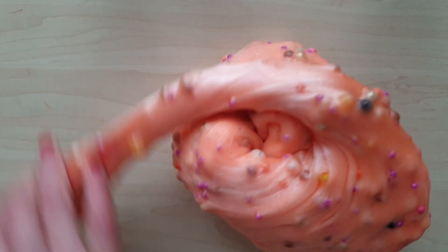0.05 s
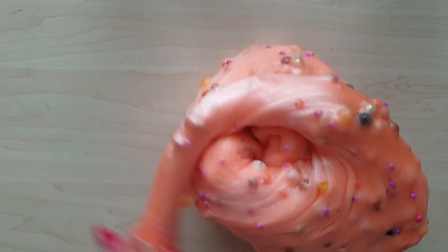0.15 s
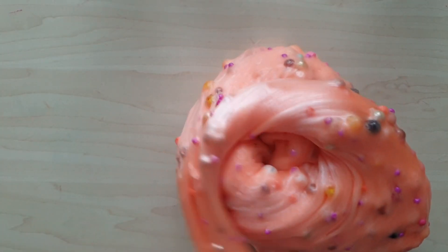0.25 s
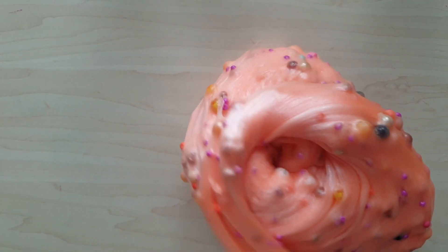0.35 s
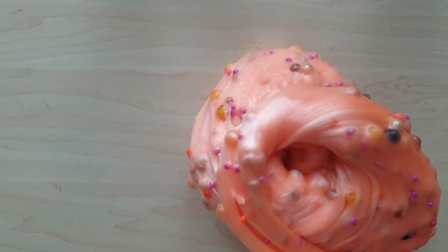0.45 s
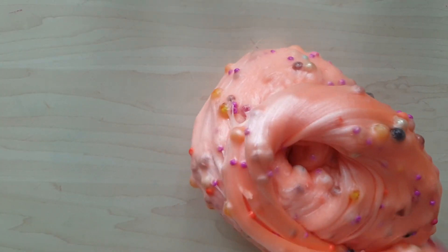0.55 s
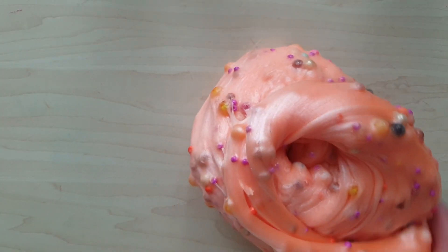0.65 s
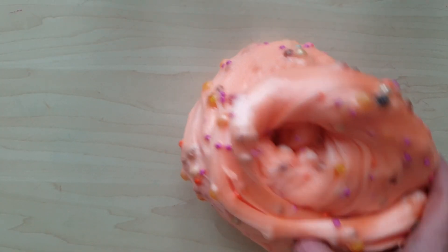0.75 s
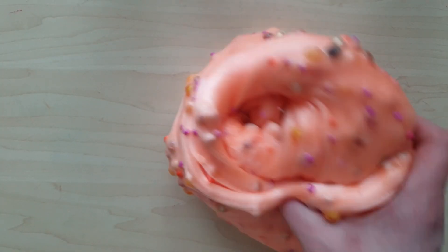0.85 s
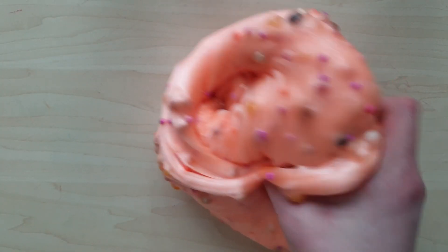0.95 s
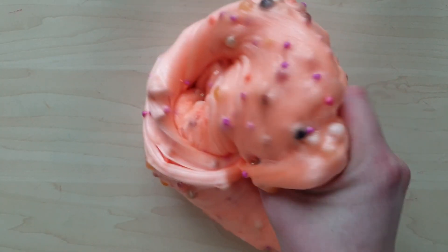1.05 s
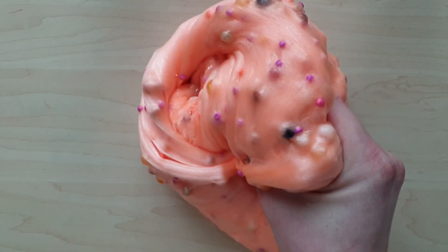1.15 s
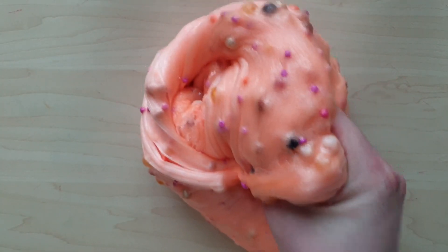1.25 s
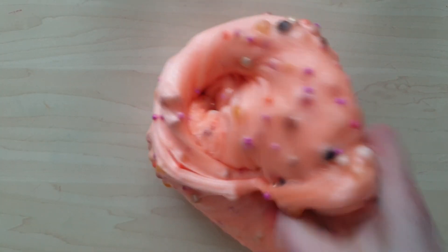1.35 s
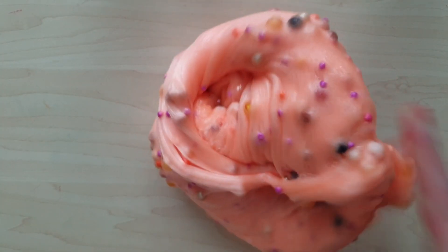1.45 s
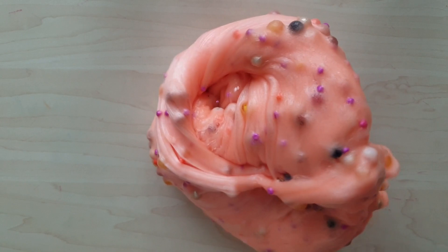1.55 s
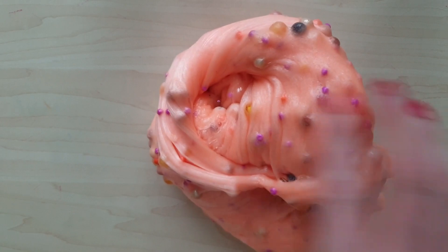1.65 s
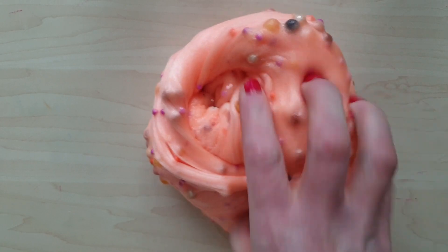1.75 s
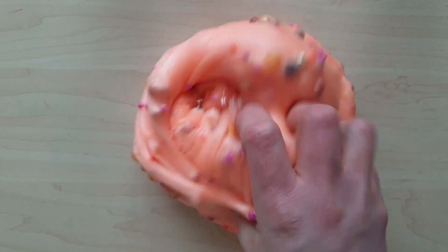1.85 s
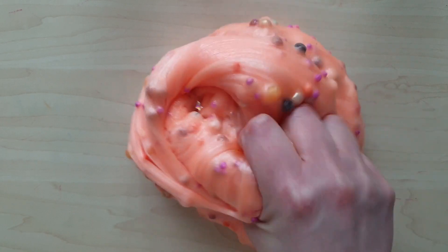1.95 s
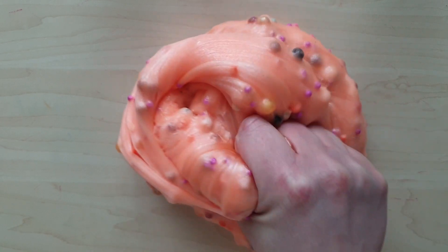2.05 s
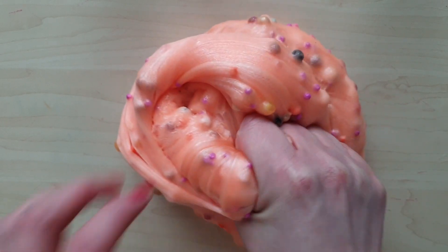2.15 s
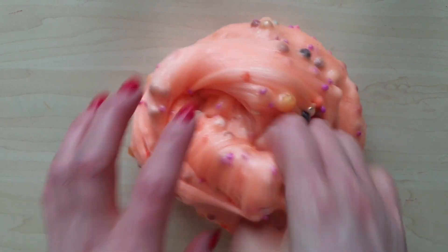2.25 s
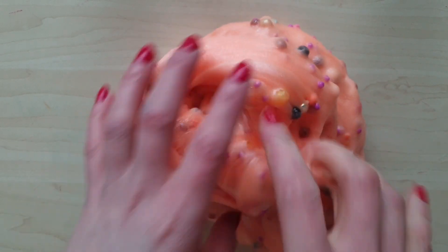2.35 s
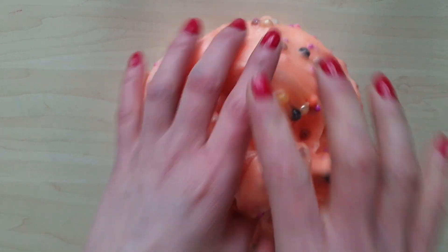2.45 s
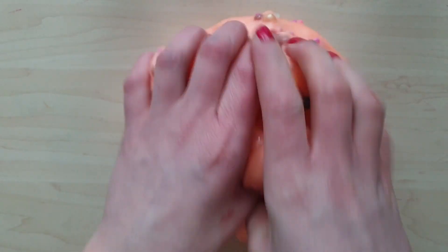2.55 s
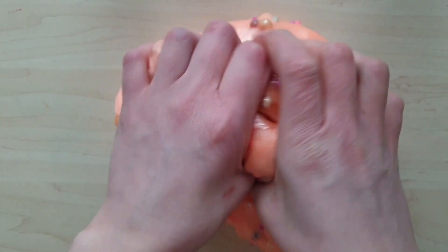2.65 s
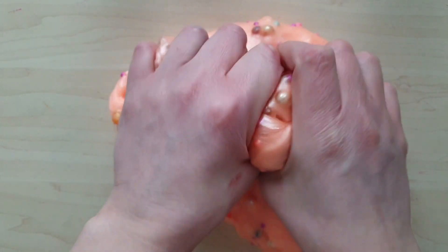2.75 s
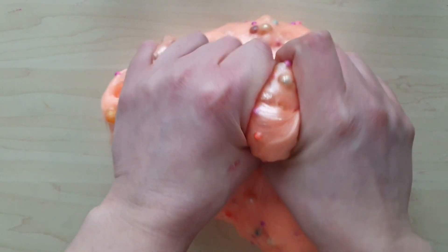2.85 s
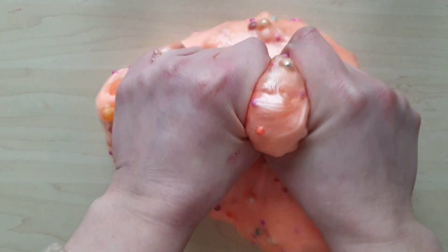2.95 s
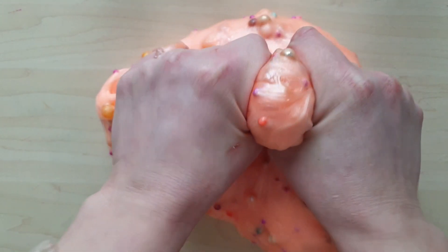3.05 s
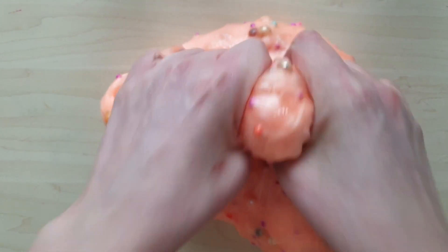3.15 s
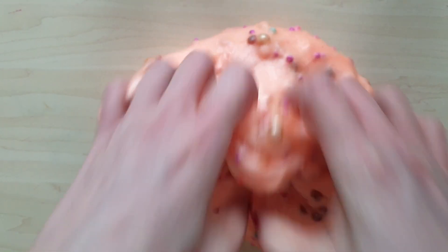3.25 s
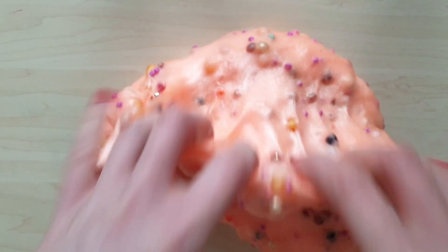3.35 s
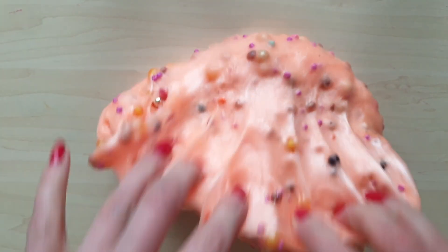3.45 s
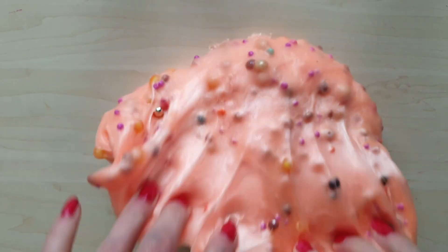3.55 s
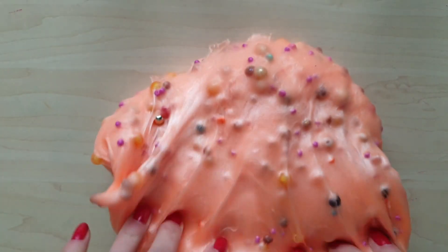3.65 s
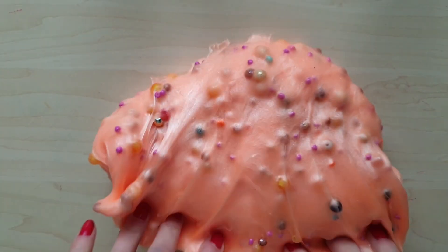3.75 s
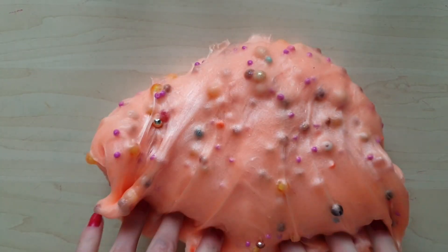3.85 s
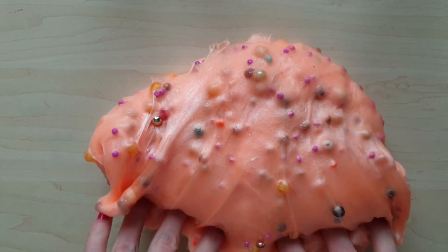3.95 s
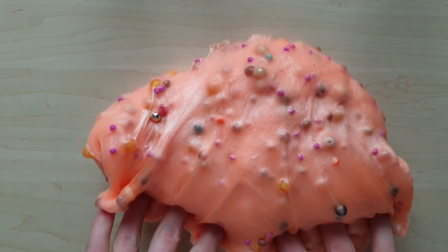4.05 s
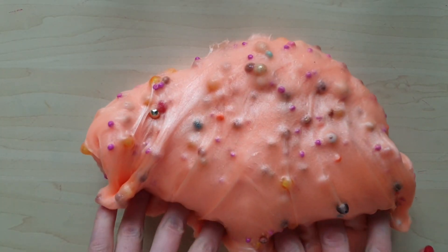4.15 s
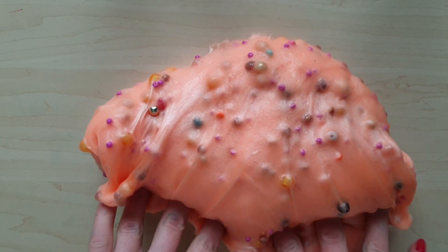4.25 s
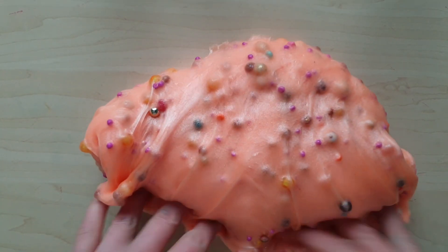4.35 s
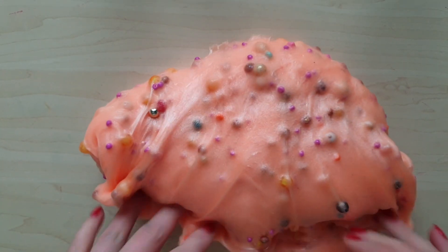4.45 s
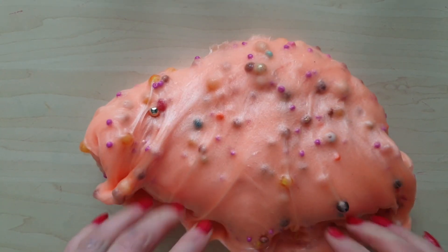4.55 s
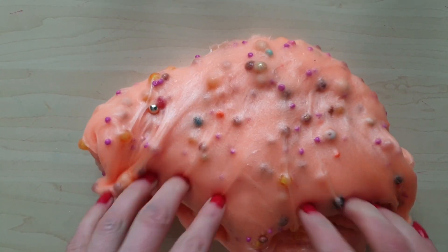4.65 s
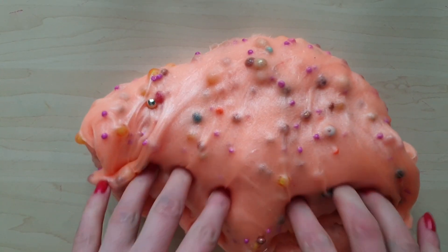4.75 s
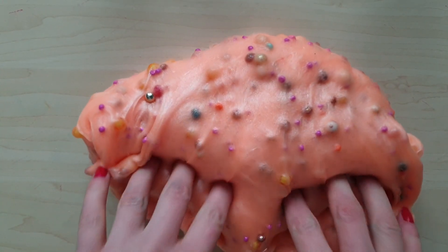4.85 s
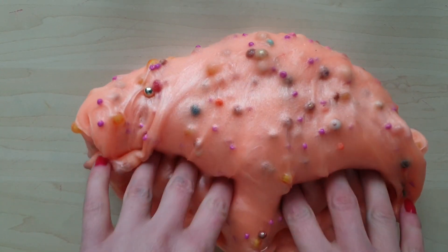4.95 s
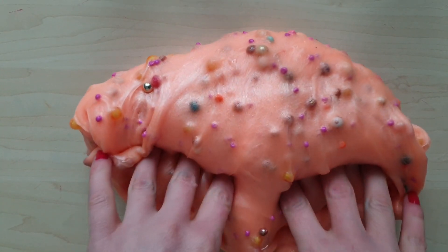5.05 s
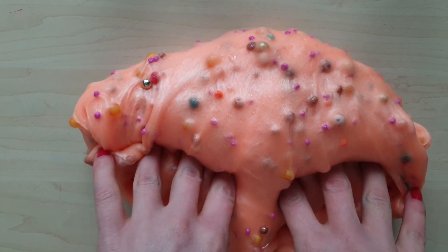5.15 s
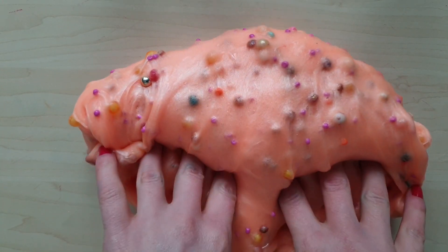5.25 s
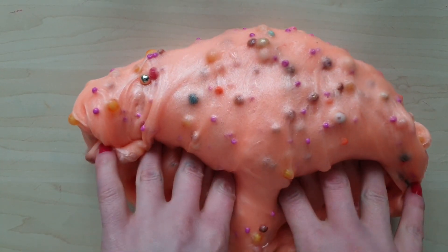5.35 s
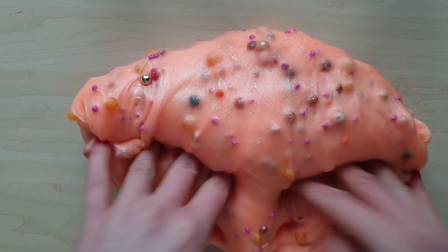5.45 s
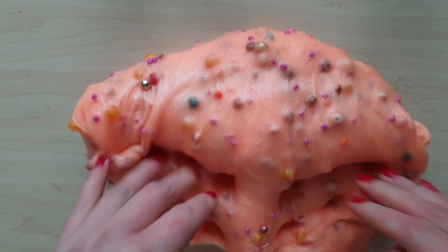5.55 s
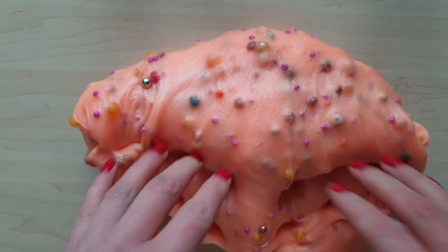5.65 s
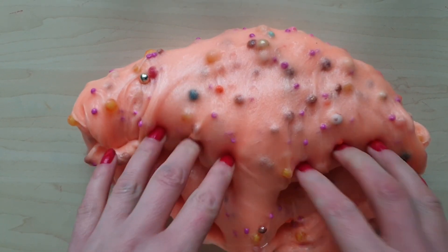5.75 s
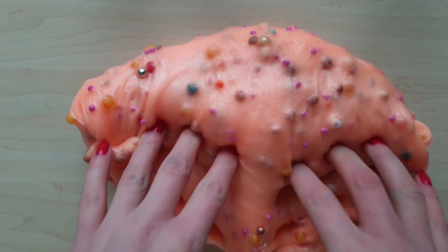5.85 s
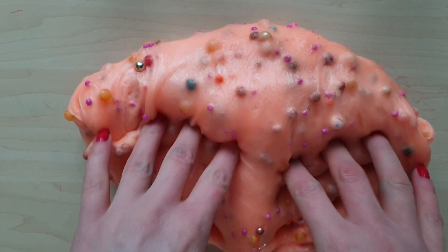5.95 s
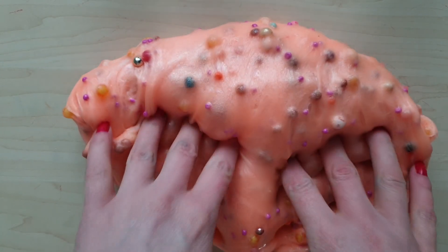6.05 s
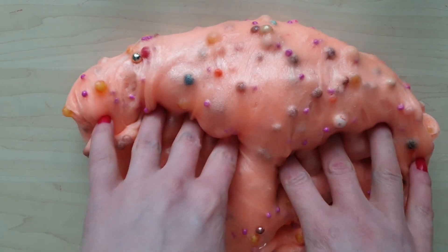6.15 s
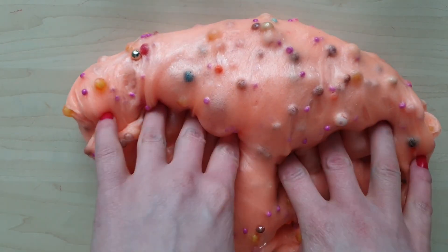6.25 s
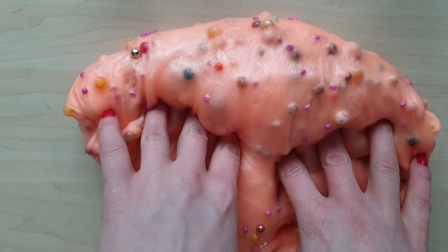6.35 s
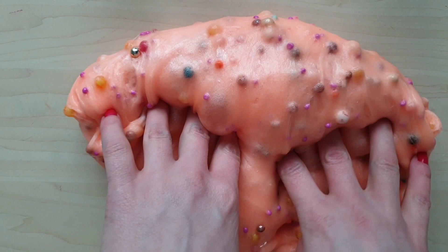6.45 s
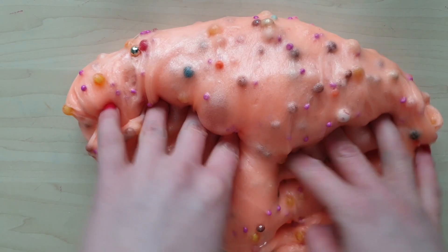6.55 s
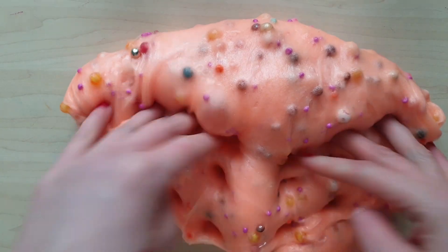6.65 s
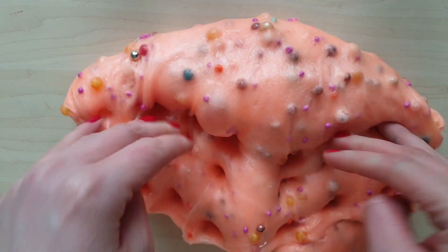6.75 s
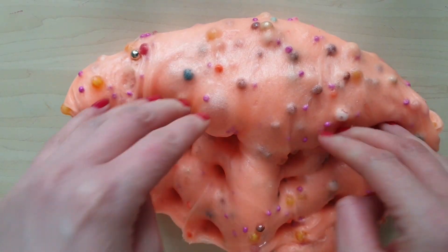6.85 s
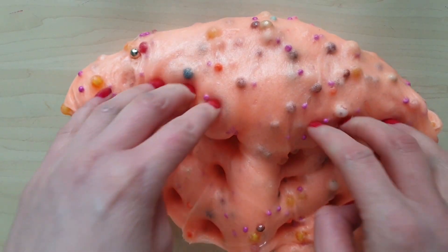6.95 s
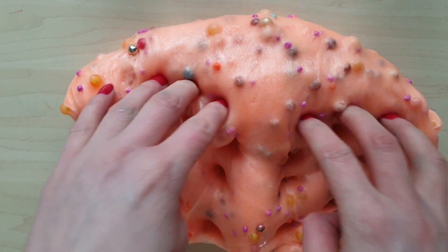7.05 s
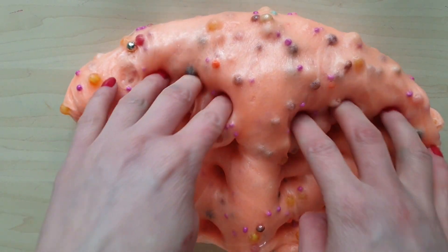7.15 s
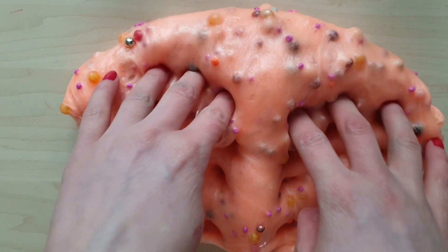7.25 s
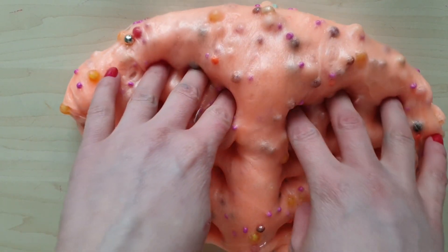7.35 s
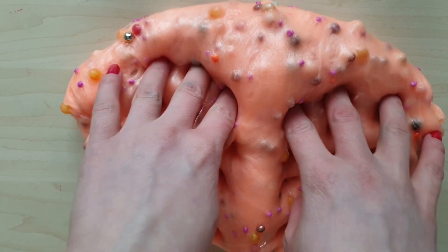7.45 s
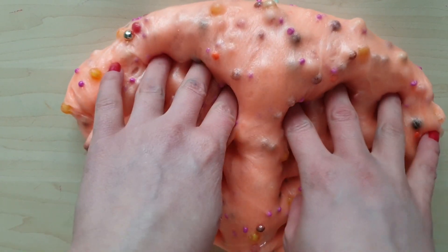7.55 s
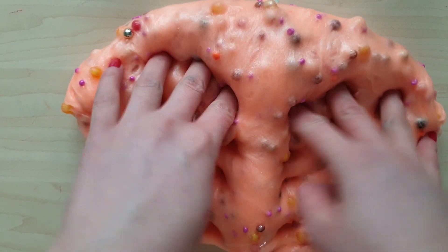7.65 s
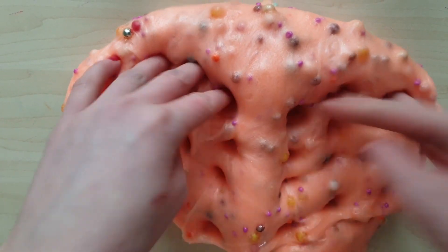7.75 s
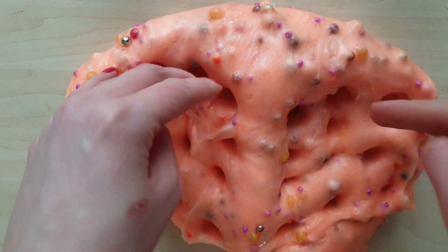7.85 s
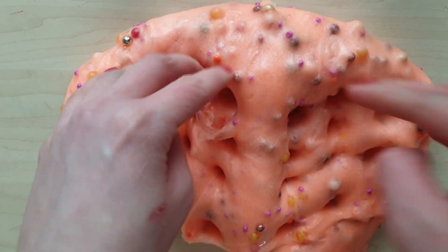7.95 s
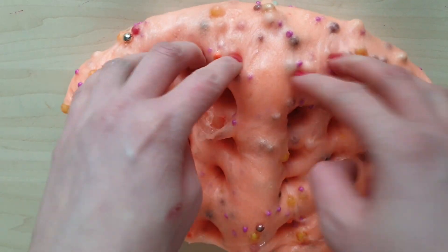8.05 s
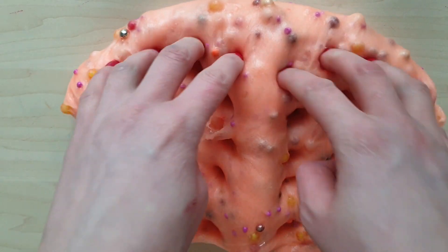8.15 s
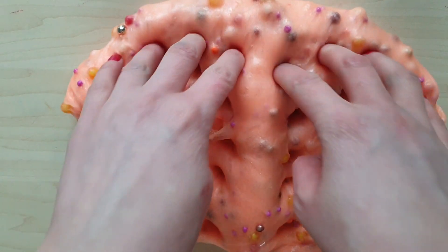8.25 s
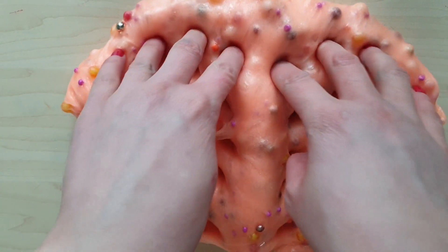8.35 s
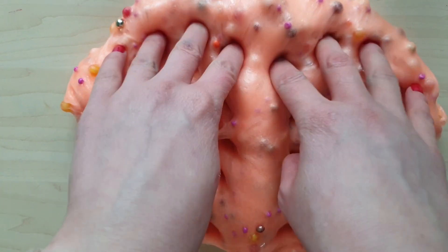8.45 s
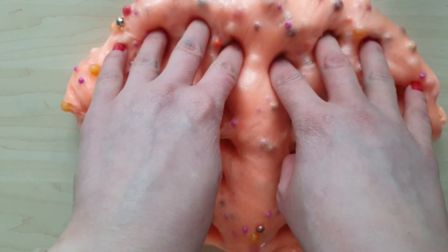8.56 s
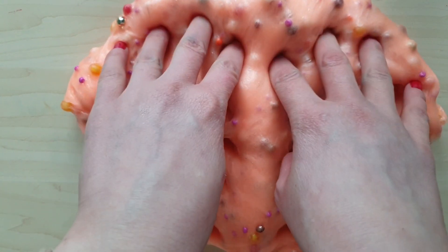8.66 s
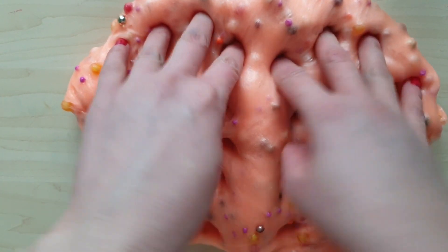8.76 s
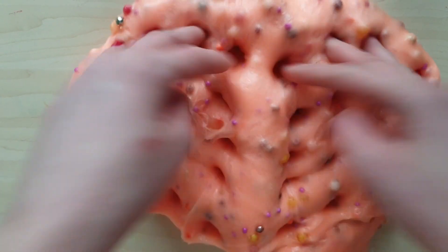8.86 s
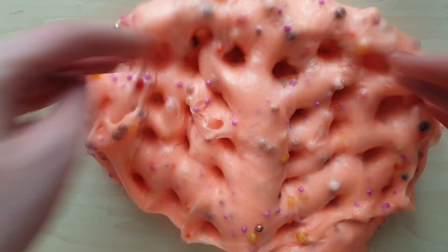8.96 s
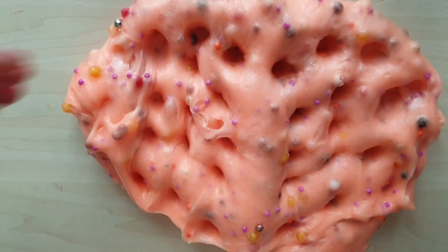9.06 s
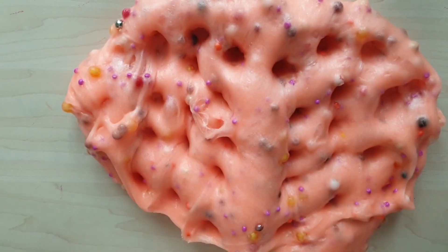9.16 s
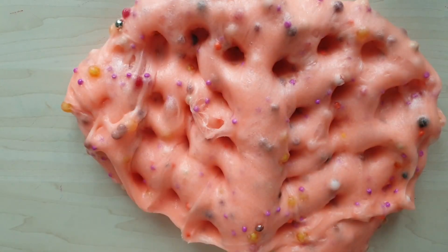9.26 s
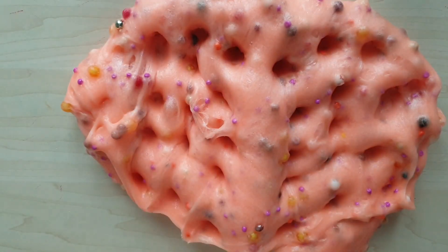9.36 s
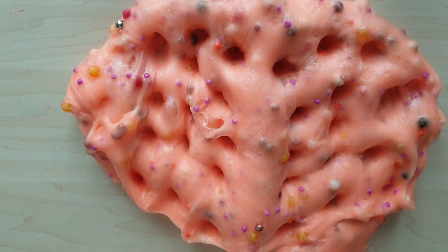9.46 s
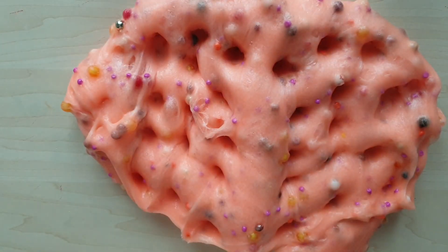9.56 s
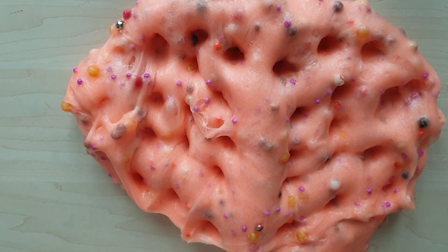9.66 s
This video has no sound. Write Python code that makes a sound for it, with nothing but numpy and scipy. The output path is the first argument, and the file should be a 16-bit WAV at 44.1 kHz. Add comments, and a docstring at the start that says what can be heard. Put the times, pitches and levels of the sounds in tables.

```python
"""Kneading bead-filled slime

Two hands knead bead-filled slime on a wooden desk, close to two microphones in a small live room.
Trapped air bursts in pops made of a ringing cavity and a crack of noise; larger pockets thump and ring the desk.
The sticky skin crackles in random ticks and tiny bubbles, and dragging or thumping makes the desk tremble low.
Two puffs of air hit the microphones, the stronger on the right. A faint hum and room air, both shaped noise,
lie underneath, and the loudest pops overload the recorder."""
import sys
import numpy as np
from scipy import signal
from scipy.fft import rfft, irfft, next_fast_len
from scipy.io import wavfile

SR = 44100
rng = np.random.default_rng(int(sys.argv[2]) if len(sys.argv) > 2 else 0)


def file_out(sig):
    """Save sig as 16-bit WAV at sys.argv[1]."""
    # one column per channel
    cols = np.atleast_2d(sig).T
    # limit, then scale
    lim = np.clip(cols, -1, 1)
    pcm = np.round(lim * 32767).astype(np.int16)
    wavfile.write(sys.argv[1], SR, pcm)


N = 428648

# bursting bubbles: start_s, level_db (over a millisecond, before the mix gains), pitch_hz (middle of its glide),
# ringing_share (0-1, the rest is crack), left_over_right_db (direct sound only)
BURSTS = [(0.1496, -39, 10200, 1, 5), (0.223, -35, 2140, 0.86, 5), (0.3355, -37, 3570, 0.02, 6),
          (0.4971, -33.5, 7150, 0.48, 0), (0.8893, -27, 7100, 0.08, 2), (0.9095, -31, 2130, 0.2, 1),
          (0.93, -32, 2110, 0.4, 0), (0.9545, -7, 5300, 0.73, 0), (1.0151, -13, 6900, 0.57, -4),
          (1.054, -2.5, 3400, 0.14, -2), (1.1377, -4.5, 4980, 0.82, -4), (1.3525, -33, 4180, 0.24, 3),
          (1.4316, -21.5, 2360, 0.64, 9), (1.4593, -22, 12200, 0.97, 2.5), (1.8068, -45, 2910, .65, 7.5),
          (1.8928, -33.5, 11800, 0.7, 0.5), (1.9401, -31.5, 3350, 0.53, 2), (1.9959, -4.5, 3840, 0.25, -1),
          (2.0404, -13.5, 5700, 0.94, 2), (2.365, -19.5, 7300, 0.13, -5), (2.645, -41, 12500, 0.87, 11),
          (2.7189, -24, 9400, 0.56, -4), (2.7734, -23, 5700, 0.15, 9), (2.8345, -24.5, 2520, 0.13, 0),
          (2.8854, -14.5, 7230, 0.86, 3), (2.9035, -0.5, 11000, 0.5, 3), (2.9365, -5.5, 3530, 0.79, 2),
          (2.9472, -4, 2555, 0.3, -3), (3.04, -21, 6500, 0.5, 6), (3.0829, -23.5, 4605, .58, 10),
          (3.2031, -21, 2960, 0.65, 1), (3.4271, -27, 6370, 0.4, 5), (3.6276, -38, 7700, 0.75, -1),
          (3.8444, -38.5, 6200, 0.34, 8.5), (3.9049, -25.5, 4790, 0.38, 3), (3.959, -36.5, 1700, 0.5, 4),
          (3.9945, -38.5, 7840, .67, -10), (4.4035, -5.5, 5700, 0.03, 2.5), (4.4269, -8, 3000, .05, -5),
          (4.5199, -19.5, 1820, 0.8, -1.5), (4.8575, -42, 4420, .7, 13.5), (4.888, -40, 7150, 0.6, 12),
          (5.0036, -46.5, 11500, .63, 6.5), (5.0572, -50, 1340, .7, 4), (5.5006, -3, 4780, 0.65, 0.5),
          (5.528, -2, 1600, 0.52, 1), (5.537, -6.5, 8200, 0, 1), (5.5719, -3, 4670, 0.1, 1),
          (5.8105, -38, 11800, 0.1, 7), (6.1375, -51, 6850, 1, 3), (6.4287, -50.5, 7000, .8, 4),
          (6.641, -3, 1470, .2, 1), (6.6637, -9, 6950, 0.6, 4), (6.6845, -3.5, 6430, 0.08, 5),
          (6.7064, -5, 1550, 0.3, 1.5), (7.0473, -32, 1190, 1, 6), (7.0883, -39, 2220, 0.15, -2.5),
          (7.1711, -37.5, 9200, 0.87, 10), (7.316, -51.5, 7000, .1, 3), (7.4522, -41, 1580, 0.91, 8),
          (7.6526, -41.5, 6770, 0.52, 9), (7.7594, -9.5, 6180, 0.17, -4), (7.7929, -9.5, 3000, 0, 1.5),
          (7.832, -8.5, 5000, 0.27, 4), (7.8618, -17.5, 2800, 0.64, 7), (8.312, -28, 11730, 0.91, 8.5),
          (8.3905, -42.5, 8450, 0.88, 3), (8.5819, -34.5, 1208, 0.87, -4), (8.874, -15, 6600, 0.46, 7.5),
          (8.8901, -11.5, 5200, 0.1, 4.5), (8.8979, -10.5, 1400, 0.18, 12), (9.0413, -26.5, 1234, 1, 5),
          (9.5731, -52, 12170, 0.17, -3.5)]
# large air pockets collapsing: start_s, thump_pitch_hz (at the start), thump_db, desk_knock_db
COLLAPSES = [(0.8901, 248, -40.5, -34), (1.055, 307, -22, -28), (1.137, 303, -41.5, -37.5),
             (1.436, 170, -22.5, -41), (1.996, 292, -25, -39), (2.329, 174, -18.5, -35),
             (2.719, 203, -36, -42.5), (2.773, 236, -35.5, -45), (2.9466, 269, -28.5, -26),
             (3.204, 261, -33, -37), (3.257, 212, -23.5, -29), (3.906, 234, -47, -47),
             (4.404, 295, -25.5, -25.5), (4.428, 241, -21.5, -21.5), (4.455, 224, -18.5, -23.5),
             (4.5205, 211, -10.5, -31.5), (4.541, 145, -25.5, -46), (5.005, 210, -51, -55),
             (5.502, 263, -17.5, -12.5), (5.546, 216, -18, -19.5), (5.585, 239, -16, -20),
             (6.082, 266, -53, -52), (6.6424, 246, -21, -20.5), (6.664, 234, -20.5, -16.5),
             (6.6858, 280, -23.5, -15), (6.7077, 326, -11, -9), (7.048, 266, -41, -39),
             (7.384, 330, -48.5, -55), (7.76, 178, -17, -16), (7.793, 283, -13, -23),
             (8.582, 317, -55, -39), (8.874, 312, -22.5, -22), (8.8979, 298, -23, -11.5),
             (9.033, 223, -44, -35.5)]
# tone of squeezed slime: frequency_hz, relative_level_db
SQUELCH_TONE = [(29, -46), (50, -11), (150, 6), (205, 2.5), (306, -3), (526, -14), (561, -16), (623, -11),
                (673, -27), (1100, -31.5), (1430, -48), (2420, -120)]
# tone of fine, bright crackle: frequency_hz, relative_level_db
FIZZ_TONE = [(2200, -30), (4000, -12.5), (7000, 2.5), (11000, -0.5), (15500, -6)]


def amp(db):
    """Decibels to gain."""
    return 10 ** (np.asarray(db) / 20)


def unit(x):
    """Scale to rms 1."""
    return x / np.sqrt(np.mean(x ** 2) + 1e-20)


def impulse(x):
    """Scale each channel to energy 1."""
    return x / (np.linalg.norm(x, axis=-1, keepdims=True) + 1e-12)


def along(points, hz):
    """Read a value between (Hz, value) points, on a log frequency axis."""
    f, v = np.transpose(points)
    return np.interp(np.log(hz + 1), np.log(f + 1), v)


def filtered(x, response):
    """Multiply the spectrum of x by a function of frequency."""
    size = next_fast_len(x.shape[-1] + 8192)
    hz = np.fft.rfftfreq(size, 1 / SR)
    return irfft(rfft(x, size) * response(hz), size)[..., :x.shape[-1]]


def coloured(x, spectrum):
    """Shape x with a table of levels over frequency, at rms 1."""
    return unit(filtered(x, lambda hz: amp(along(spectrum, hz))))


def add(track, s, sound):
    """Mix a sound into a stereo track at time s."""
    part = track[:, max(round(s * SR), 0):][:, :sound.shape[-1]]
    part += sound[..., :part.shape[-1]]


def swell(s, hold, rise, fall, sag=0):
    """Gain that rises to 1 at time s, sags while held, then falls; the slopes are in dB per second."""
    t = np.arange(N) / SR - s
    return amp(rise * np.minimum(t, 0) - sag * np.clip(t, 0, hold) - fall * np.maximum(t - hold, 0))


def air_noise():
    """White noise, partly shared by the two microphones."""
    return rng.standard_normal((2, N)) * 0.68 + rng.standard_normal(N)


def narrow(centre_hz, width_hz):
    """A narrow band of noise at rms 1."""
    return unit(filtered(air_noise(), lambda hz: 1 / (1 + ((hz - centre_hz) / width_hz) ** 2) ** 2))


def crackle(spectrum, rate, spread_db):
    """Countless tiny ticks at random times, rate per second, each of its own size and place."""
    count = int(rate * N / SR)
    at = rng.integers(0, N, count)
    size = amp(spread_db * np.minimum(rng.exponential(size=count), 3)) * rng.choice([-1, 1], count)
    channels = []
    for _ in range(2):
        arrival = (at + rng.integers(0, 5, count)) % N
        heard = size * amp(rng.normal(0, 2, count))
        channels.append(np.bincount(arrival, heard, N))
    return coloured(np.array(channels), spectrum)


def bubbles(rate, hz, scatter, cycles, spread_db):
    """Tiny bubbles, rate per second, each a blip of a few cycles at its own pitch, size and place."""
    count = int(rate * N / SR)
    t = np.arange(SR // 150) / SR
    pitch = np.clip(hz * np.exp(scatter * rng.standard_normal((count, 1))), 600, 14000)
    age = t * pitch / cycles
    size = amp(spread_db * np.minimum(rng.exponential(size=(count, 1)), 3))
    blips = size * age * np.exp(-age) * np.sin(2 * np.pi * pitch * t)
    at = (rng.integers(0, N - len(t), (count, 1)) + np.arange(len(t))).ravel()
    channels = []
    for _ in range(2):
        heard = blips * amp(rng.normal(0, 3, (count, 1)))
        channels.append(np.bincount(at, heard.ravel(), N))
    return unit(np.array(channels))


def room(x, build_s=0.0037, mono_hz=900):
    """A few near echoes, then a tail that dies band by band, alike in both ears in the bass."""
    # time to die away by 60 dB: frequency_hz, decay_s
    decay_times = [(100, 0.47), (230, 0.65), (500, 0.5274), (1500, 0.38), (4500, 0.4134), (9000, 0.35),
                   (15000, 0.3556)]
    # colour of the tail: frequency_hz, level_db
    tail_tone = [(100, 1.66), (250, 1.5), (1000, -2), (3000, 0.5), (8000, -1.4), (15000, -2.3)]
    # echoes from near surfaces: delay_s, level_db (against the tail's total energy)
    near_echoes = [(.0044, -16), (.0085, -15.5), (.0098, -15), (0.0131, -9.5), (0.0142, -14.5),
                   (.0225, -17.5)]
    hz, t, z = signal.stft(rng.standard_normal((2, SR * 2 // 3)), SR, nperseg=256)
    z = z * amp(along(tail_tone, hz)[:, None] - 60 * t / along(decay_times, hz)[:, None])
    mid = z[0]
    side = z[1] * (hz / np.hypot(hz, mono_hz))[:, None]
    tail = signal.istft(np.array([mid + side, mid - side]), SR, nperseg=256)[1]
    age_s = np.arange(tail.shape[1]) / SR
    tail = impulse(tail * (1 - np.exp(-(age_s / build_s) ** 2)))
    for delay_s, db in near_echoes:
        # each echo shifts a little every time, and a little between the ears
        arrival = delay_s + rng.normal(0, .0003) + rng.normal(0, .0001, 2)
        tail[[0, 1], np.abs(arrival * SR).astype(int)] += amp(db)
    return signal.fftconvolve(np.atleast_2d(x), impulse(tail), axes=1)


def in_room(x, wet_db):
    """Direct sound plus room, at about unchanged power."""
    return (x + amp(wet_db) * room(x)[:, :N]) / np.hypot(1, amp(wet_db))


def background():
    """Room air as wide shaped noise, and an appliance's hum as narrow bands of noise."""
    # hum bands: centre_hz, width_hz, level_db
    hum_bands = [(67, 4, -70.5), (815, 150, -75)]
    # tone of the room air: frequency_hz, relative_level_db
    air_tone = [(15, -34.5), (25, -13), (70, 2.5), (117, -1.5), (217, -1.5), (489, -12.5), (775, -13),
                (1070, -22.5), (1440, -20), (1700, -25.5), (3520, -27), (7710, -27), (9320, -30.5),
                (14800, -23.5), (16000, -34)]
    hum = sum(amp(db) * narrow(hz, width) for hz, width, db in hum_bands)
    return hum + amp(-66.5) * coloured(air_noise(), air_tone)


def shudder(after_full_thump_db=-49, db_per_thump_db=0.44, lag_s=0.066):
    """The desk trembles low while the lump is dragged, and for a while after each thump."""
    # the lump dragged over the desk: start_s (at full level), length_s, level_db
    drag_times = [(0.0, 0.34, -55.5), (1.701, 0.37, -59.5), (3.692, 0.17, -49.5), (8.57, .02, -58)]
    rise, drag_fall, jolt_fall = 201.5, 111, 39  # dB per second
    gains = [amp(db) * swell(s, length, rise, drag_fall) for s, length, db in drag_times]
    for s, _, thump_db, _ in COLLAPSES:
        level = amp(after_full_thump_db + db_per_thump_db * thump_db)
        gains.append(level * swell(s + lag_s, 0, rise, jolt_fall))
    return np.sqrt(sum(gain ** 2 for gain in gains)) * narrow(centre_hz=63.5, width_hz=20)


def peels(wet_db=-1, fizz_db=-1, snap_db=-6):
    """Sparse, faint ticks and blips, mostly skin unsticking from the slime, with a sharper snap now and then."""
    # fingers sliding and peeling off, save the row at 5.43, a faint hiss swelling just before the burst at 5.5:
    # start_s (at full level), length_s, wet_crackle_db, fizz_db
    peel_times = [(0.0, 0.012, -58, -50.5), (0.235, 0.059, -53, -49.5), (0.741, 0.27, -60.5, -54),
                  (1.888, 0.11, -56.5, -59.5), (2.703, 0.22, -50.5, -47), (3.616, 0.54, -71.5, -64),
                  (4.85, 0.23, -66.5, -65.5), (5.43, .05, -72, -66), (5.973, 0.22, -76, -68),
                  (6.586, 0.05, -64.5, -59), (7.194, 0.035, -79, -63), (7.554, .14, -73, -65),
                  (8.379, 0.028, -85, -66), (8.803, 0.051, -74, -63)]
    wet, fizz = sum(amp([[blip_db], [tick_db]]) * swell(s, length, rise=170, fall=110)
                    for s, length, blip_db, tick_db in peel_times)
    blips = bubbles(rate=220, hz=2000, scatter=.55, cycles=.8, spread_db=4)
    ticks = crackle(FIZZ_TONE, rate=500, spread_db=4.5)
    snaps = crackle(FIZZ_TONE, rate=30, spread_db=3)
    dry_fizz = fizz * (amp(fizz_db) * ticks + amp(snap_db) * snaps)
    return in_room(amp(wet_db) * wet * blips + dry_fizz, wet_db=2.0)


def froth(fizz_db=-27, bubble_db=-28, rise_db_per_s=1600, fall_db_per_s=450, lead_s=.02):
    """A short swell of fine ticks and tiny bubbles around each pop, quick to rise and slower to fade."""
    gain = np.zeros((2, N))
    t = np.arange(SR // 8) / SR - lead_s
    shape = amp(np.minimum(rise_db_per_s * t, -fall_db_per_s * t))
    for s, db, _, _, pan_db in BURSTS:
        add(gain, s - lead_s, amp(db + np.array([[pan_db], [-pan_db]]) / 2) * shape)
    ticks = crackle(FIZZ_TONE, rate=1500, spread_db=4)
    blips = bubbles(rate=700, hz=2800, scatter=.6, cycles=1, spread_db=4)
    return in_room(gain * (amp(fizz_db) * ticks + amp(bubble_db) * blips), wet_db=-5)


def pops(direct_db=0.5, room_db=-1, drier_db_per_octave=1.34, small_hz=5000, glide=0.11, reach=3.7):
    """A bubble's skin tears with a crack while its opening cavity rings for a few cycles."""
    # tone of a tearing skin: frequency_hz, relative_level_db
    crack_tone = [(150, -21.5), (600, -5), (1600, -5.5), (5000, -3), (10000, -2.5), (16000, -13)]
    life_s, tear_s, bite_s = .00036, .0015, .00025  # ring life at 3000 Hz, crack fade, crack onset
    out, t = np.zeros((2, N)), np.arange(SR // 100) / SR
    for s, db, hz, share, pan_db in BURSTS:
        wet_db = drier_db_per_octave * min(np.log2(hz / small_hz), 0)  # big bubbles sound drier
        share = np.clip(share, 0, 1)
        age = t / life_s * (hz / 3000) ** 0.45  # small cavities die sooner
        # the pitch rises as the hole widens; each microphone catches another phase
        phase = 2 * np.pi * np.cumsum(hz * (1 + glide * (np.tanh(age) - .5))) / SR
        ring = impulse(age * np.exp(-age * 2.1) * np.sin(phase + rng.normal(0, 0.56, (2, 1))))
        # big bubbles crack more dully than small ones
        noise = coloured(rng.standard_normal((2, len(t))), crack_tone)
        rip = filtered(noise, lambda f: 1 / np.hypot(1, f / (reach * hz)))
        crack = impulse(rip * np.exp(-t / tear_s) * (1 - np.exp(-t / bite_s)))
        mix = np.sqrt(share) * ring + np.sqrt(1 - share) * crack
        pop = amp(db) * np.sqrt(SR / 1000) * mix  # turns energy into level over a millisecond
        add(out, s, pop * amp(direct_db + np.array([[pan_db], [-pan_db]]) / 2))
        add(out, s, room(pop) * amp(room_db + wet_db))
    return out


def pockets(ring_db=-8, room_db=-1, cycles=1.3, knock_life_s=0.0041, sag=.35):
    """A collapsing pocket thumps and knocks the desk, which rings on unevenly under the damping lump."""
    # ringing modes of the desk and the space over it: pitch_hz, level_db, decay_s (to fall by 60 dB)
    desk_modes = [(109, -18, .5), (151.8, -17, 0.49), (202.4, -15.5, 0.29), (224, -13.5, 0.37),
                  (279.4, -11.5, 0.44), (332.7, -12, 0.43), (364.3, -13.5, 0.47), (431, -17, .3),
                  (538, -6.5, 0.16), (631.4, 1.5, 0.26), (790, -12.5, 0.27)]
    out, t = np.zeros((2, N)), np.arange(SR // 2) / SR
    onset = 1 - np.exp(-t / 0.0007)
    for s, hz, thump_db, knock_db in COLLAPSES:
        fade = np.exp(-t * hz / cycles)
        pitch = hz * (1 - sag * (1 - fade))  # the pitch sags as the skin goes slack
        squelch = coloured(rng.standard_normal(len(t)), SQUELCH_TONE)
        swing = np.sin(2 * np.pi * np.cumsum(pitch) / SR) + 0.38 * squelch
        thump = amp(thump_db) * swing * fade * onset
        knock_wave = np.sin(2 * np.pi * rng.normal(590, 35) * t)
        knock = amp(knock_db) * knock_wave * np.exp(-t / knock_life_s) * onset
        ring = 0
        for mode_hz, db, decay_s in desk_modes:
            waver = .018 * np.interp(t, t[::220], rng.standard_normal(len(t[::220])))
            phase = 2 * np.pi * (np.cumsum(mode_hz * (1 + waver)) / SR + rng.random())
            ring = ring + amp(db + rng.normal(0, 2.3) - 60 * t / decay_s) * np.sin(phase)
        add(out, s, thump + knock + amp(knock_db + ring_db) * ring * onset)
        add(out, s, amp(room_db) * room(thump + .5 * knock))
    return out


def puff(s, db, hz, life_s, left_db):
    """A jet of air strikes a microphone and swings it slowly for a couple of cycles."""
    out, t = np.zeros((2, N)), np.arange(SR // 5) / SR
    fade = np.exp(-(t / life_s) ** 2)
    swing = -np.cos(2 * np.pi * hz * t + 0.77) * fade * (1 - np.exp(-t / 0.00028))
    add(out, s, amp([[db + left_db], [db]]) * swing)  # left_db is relative to the right
    return out


def presses(wet_db=-5, fizz_db=-3, bubble_db=-9):
    """Air is squeezed from under the lump: a low squelch beneath dense crackle and tiny bubbles."""
    # palms pressing the lump flat: start_s (at full weight), hold_s, squelch_db, crackle_db
    press_times = [(1.424, 0.099, -31, -28), (2.312, 0.13, -31, -29), (3.235, 0.29, -35.5, -29.5)]
    # tone of the wet skin: frequency_hz, relative_level_db
    wet_tone = [(260, -34), (450, -4), (621, -1.5), (673, -2.5), (1140, -11), (1590, -10.5), (1880, -11),
                (5000, -12), (6500, -45.5), (11000, -120)]
    # dB per second: weight comes on, palms lift, air runs out
    rise, fall, sag = 318, 420, 76.5
    low, wet = sum(amp([[low_db], [crackle_db]]) * swell(s, hold, rise, fall, sag)
                   for s, hold, low_db, crackle_db in press_times)
    squelch = low * crackle(SQUELCH_TONE, rate=400, spread_db=0.5)
    skin = amp(wet_db) * wet * crackle(wet_tone, rate=1500, spread_db=1.5)
    fizz = amp(fizz_db) * wet * crackle(FIZZ_TONE, rate=3700, spread_db=4.5)
    blips = amp(bubble_db) * wet * bubbles(rate=800, hz=2700, scatter=.5, cycles=1, spread_db=4)
    return in_room(squelch, wet_db=-6.5) + in_room(skin + fizz + blips, wet_db=-7.5)


def scene():
    """Everything that reaches the two microphones."""
    faint_puff = puff(s=1.0545, db=-23, hz=58, life_s=0.023, left_db=-9.5)
    strong_puff = puff(s=7.7595, db=3, hz=63, life_s=0.019, left_db=-33.5)
    hands = peels() + froth() + pops() + pockets() + presses()
    return background() + shudder() + hands + faint_puff + strong_puff


def record(dry, limit=.95, top_hz=15900):
    """The recorder rounds off the loudest peaks and cuts steeply above its band limit."""
    clipped = dry / (1 + np.abs(dry / limit) ** 6) ** (1 / 6)
    return filtered(clipped, lambda hz: 1 / np.sqrt(1 + (hz / top_hz) ** 120))


dry = scene()
out = record(dry)
file_out(out)
```